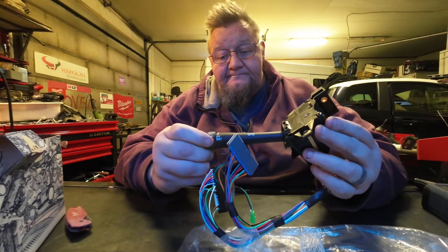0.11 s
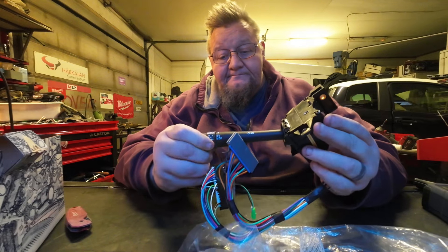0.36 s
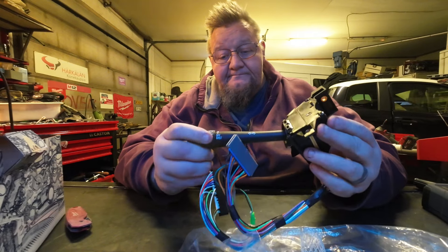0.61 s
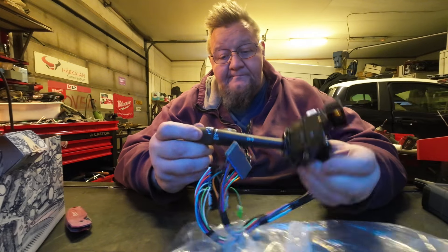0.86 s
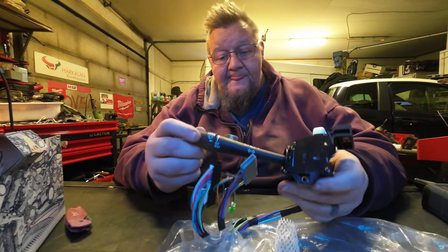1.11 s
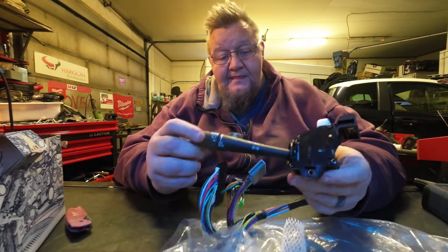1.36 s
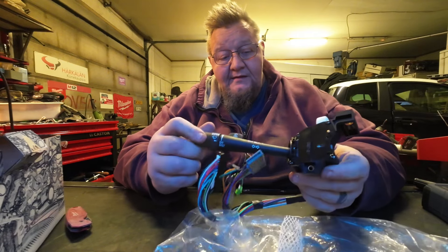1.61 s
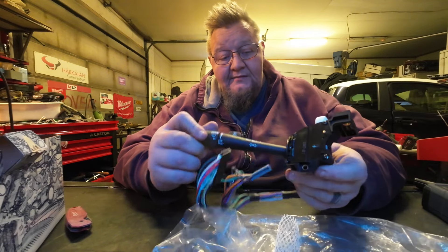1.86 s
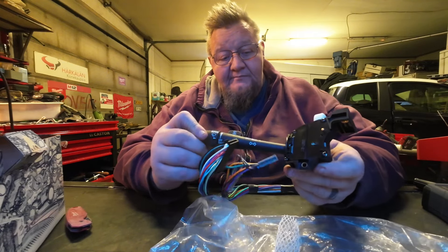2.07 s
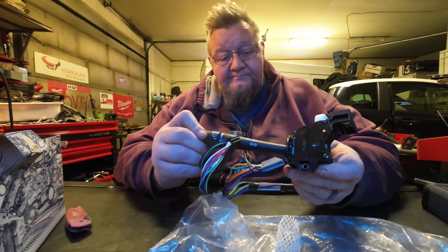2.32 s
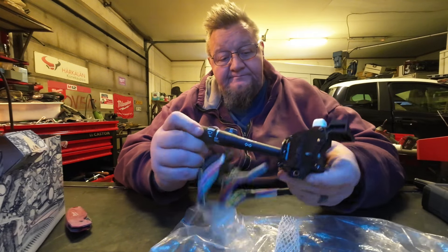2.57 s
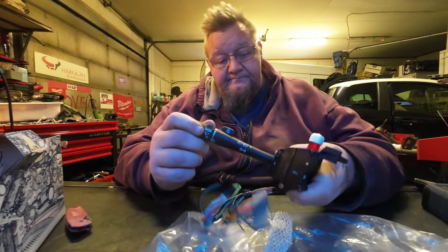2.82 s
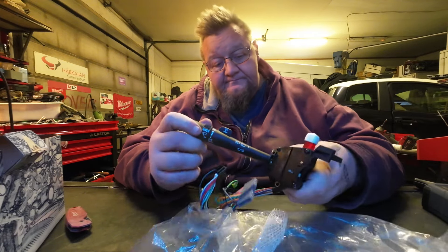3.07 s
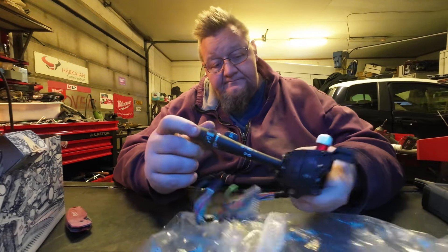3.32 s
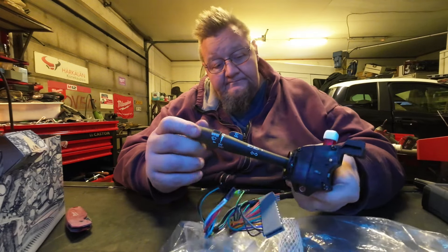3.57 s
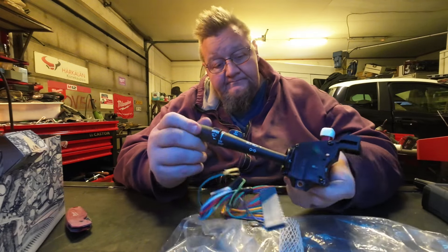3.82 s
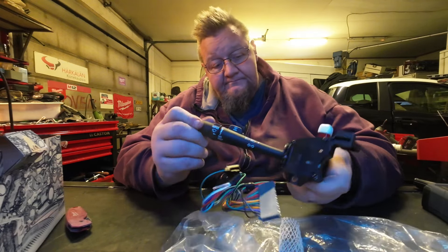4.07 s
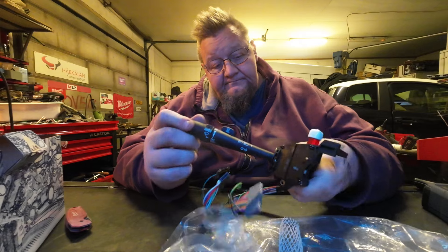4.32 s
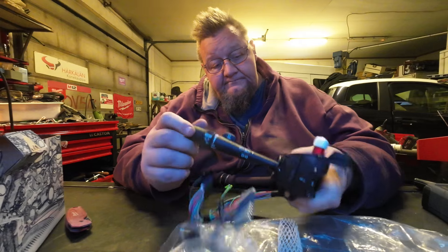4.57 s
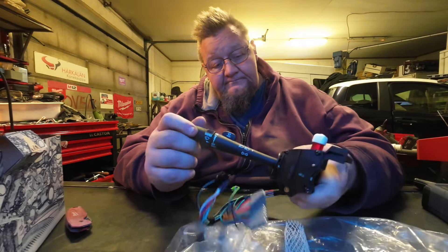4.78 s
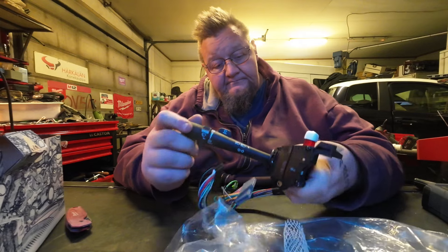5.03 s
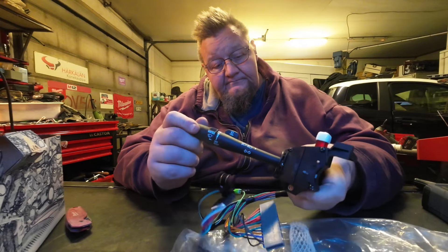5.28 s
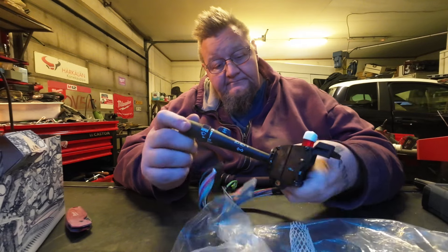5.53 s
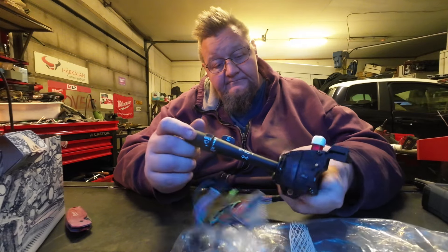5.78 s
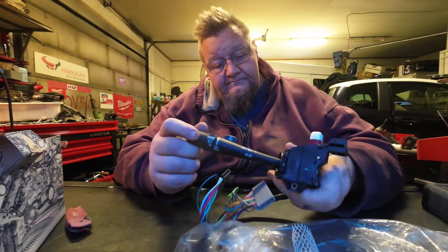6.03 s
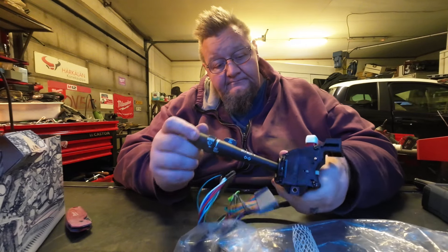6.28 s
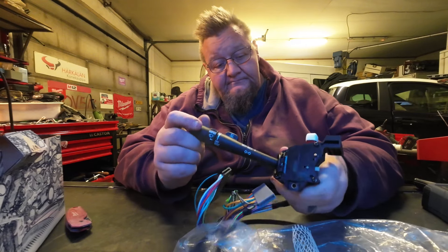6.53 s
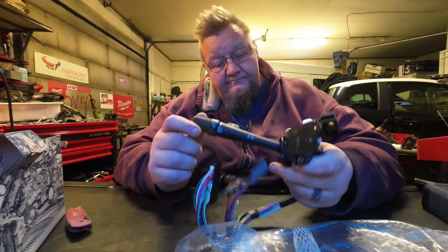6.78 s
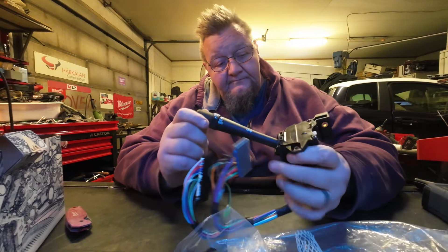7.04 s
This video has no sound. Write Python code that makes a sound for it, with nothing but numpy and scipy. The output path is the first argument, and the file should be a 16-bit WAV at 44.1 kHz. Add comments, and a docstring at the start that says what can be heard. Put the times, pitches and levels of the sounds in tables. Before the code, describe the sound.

In a quiet garage with a faint low fan hum, a wire harness drags across a thin plastic bag, crinkling and popping in uneven bursts. From about three seconds, a plastic stalk switch is worked by hand, giving short sharp clicks at spaced intervals, some with soft low knocks through the bench. The bag keeps rustling between them. Close stereo microphone, slight room echo.

```python
"""A distant fan and other hums, sine waves of wavering phase, lie over the hiss of a garage's air throughout.
Soon a switch's wire harness drags over a plastic bag: shaped noise rustles, short ticks and puffs crackle.
Fingers and wires rub as bands of hiss; the workbench adds low noise swells and, later, fading knocks.
From about three seconds on, the detent of the plastic stalk switch snaps: short rattles make it ring.
Two close microphone ports agree best in the middle range and differ more in the treble."""
import sys
import numpy as np
from scipy import signal
from scipy.fft import rfft, irfft, next_fast_len
from scipy.io import wavfile
from scipy.ndimage import uniform_filter1d

SR = 44100
rng = np.random.default_rng(int(sys.argv[2]) if len(sys.argv) > 2 else 0)


def wav_record(signal):
    """Record a signal, one row per channel, as 16-bit PCM in the file named by sys.argv[1]."""
    frames = np.transpose(np.atleast_2d(signal))
    bounded = np.clip(frames, -1, 1)
    # unit amplitude maps onto the largest positive 16-bit level
    quanta = np.round(bounded * 32767).astype(np.int16)
    wavfile.write(sys.argv[1], SR, quanta)


def field_ratio(decibels):
    """Amplitude ratio for a level in dB (20 dB per decade); scalars and array-likes work."""
    return 10 ** (np.asarray(decibels, dtype=float) / 20)


N = 314874  # length in samples

# How far the two ports differ for sound from all around the room.
# Each row: frequency in Hz, port difference against port sum in dB.
ROOM_SIDE = [(60, 1.5), (110, -14), (200, -30), (380, -21.5), (700, -10), (1290, -100.5), (2380, -16.5),
             (4400, -3.5), (8120, 3.5), (15000, 3.5)]


def evened(x):
    """Gives a sound an rms of 1."""
    return x / np.sqrt(np.mean(x ** 2) + 1e-20)


def levelled(x):
    """Gives each short sound an rms of 1 over its first 3 ms."""
    return x / np.sqrt(np.mean(x[..., :132] ** 2, -1, keepdims=True) + 1e-20)


def read(points, hz):
    """Reads a table between its points, along a logarithmic frequency axis."""
    f, value = np.transpose(points)
    return np.interp(np.log(hz + 1), np.log(f + 1), value)


def coloured(x, points):
    """Filters x by a spectrum in dB."""
    size = next_fast_len(N)
    gain = field_ratio(read(points, np.fft.rfftfreq(size, 1 / SR)))
    return irfft(rfft(x, size) * gain, size)[..., :N]


def band(x, lo_hz, hi_hz):
    """Keeps the frequencies from lo_hz to hi_hz."""
    return signal.sosfilt(signal.butter(2, [lo_hz, hi_hz], "band", fs=SR, output="sos"), x)


def add(mix, s, sound):
    """Adds a sound to the mix at s seconds, cut off where the mix ends."""
    part = mix[..., round(s * SR):][..., :sound.shape[-1]]
    part += sound[..., :part.shape[-1]]


def ports(total, other, side):
    """Left and right from the port sum and an unlike signal that makes their difference."""
    difference = coloured(other, side)
    return np.array([total + difference, total - difference])


def swells(rows, rest_db, roundness):
    """Level in dB of overlapping swells above a resting level."""
    t = np.arange(0, N + 32, 32) / SR
    s, db, rise, fall = np.transpose(rows)[:, :, None]
    before = (s - t) / np.maximum(rise, .01)
    after = (t - s) / np.maximum(fall, .01)
    away = np.where(t < s, before, after)
    power = field_ratio(2 * rest_db) + field_ratio(2 * (db - 20 * away ** roundness)).sum(0)
    return np.interp(np.arange(N) / SR, t, 10 * np.log10(power))


def air():
    """Room air with slight drifting patches, and the wavering lines of the fan and other hums."""
    # Colour of the room air. Each row: frequency in Hz, relative level in dB per Hz.
    air_colour = [(25, -1), (65, -26.5), (108, -2.5), (163, -13.5), (200, -7.5), (255, -14.5), (340, -6),
                  (540, -10.5), (650, -18), (770, -10), (900, -16), (1200, -12), (1600, -19), (2500, -23),
                  (4000, -35.5), (5500, -37), (7500, -48), (10000, -47.5), (11200, -46.5), (12000, -72),
                  (13500, -64), (15300, -59), (16500, -59)]
    # Blade-pass hum of the fan. Each row: multiple of fan_hz, rms level in dB, width in Hz.
    fan_lines = [(1, -65, 2.2), (2, -77, 6.8), (3, -69.5, 4.53), (4, -68, 4.5), (5, -71.5, 2.8),
                 (7, -72.5, 10)]
    # Other steady hums. Each row: frequency in Hz, rms level in dB, width in Hz.
    other_hums = [(100, -64, 1.5), (121, -65, 2.5), (365, -72, 10), (400, -71, 5)]
    fan_hz, air_db = 108.4, -57.5
    z = signal.stft(rng.standard_normal((2, N + 2048)), nperseg=1024)[2]
    patches = uniform_filter1d(rng.standard_normal(z.shape[1:]), 10, 0)
    patches = evened(uniform_filter1d(patches, 8, 1))
    noise = signal.istft(z * field_ratio(1.7 * patches), nperseg=1024)[1][:, :N]
    noise = coloured(noise, air_colour)
    noise *= field_ratio(air_db) / np.std(noise[0])
    fan = [(round(k) * fan_hz, db, width_hz) for k, db, width_hz in fan_lines]
    for hz, db, width_hz in [*fan, *other_hums]:
        # the phase drifts, the level holds
        wander = np.cumsum(rng.standard_normal(N)) * np.sqrt(2 * np.pi * width_hz / SR)
        noise[0] += field_ratio(db) * evened(np.sin(2 * np.pi * hz * np.arange(N) / SR + wander))
    return ports(*noise, ROOM_SIDE)


def drag_db():
    """How strongly the harness drags over the bag, in dB: strokes above a resting level."""
    # Strokes of the harness. Each row: loudest moment in seconds, drag level in dB,
    # rise in seconds over 20 dB, fall in seconds over 20 dB.
    strokes = [(.25, -75.5, .3, 0.13), (.45, -63, 0.14, 0.057), (.535, -59, 0.022, 0.098),
               (.62, -61, 0.13, 0.026), (.896, -46, 0.15, 0.15), (1.1, -53.5, 0.35, 0.17),
               (1.4, -53, 0.34, 0.36), (1.61, -58.5, 0.089, 0.033), (1.74, -59.5, 0.046, 0.16),
               (1.86, -55, 0.083, 0.11), (1.932, -47.5, 0.026, 0.021), (1.99, -58, 0.011, 0.013),
               (2.62, -58, 0.09, .05), (2.68, -42, 0.06, 0.084), (2.79, -47, 0.17, 0.18),
               (3.07, -52.5, 0.28, 0.082), (3.3, -48.5, 0.11, 0.048), (3.44, -46, 0.18, .13),
               (3.66, -70, 0.1, .1), (3.74, -61, 0.058, 0.081), (3.91, -70.5, 0.1, 0.061),
               (4.17, -58, 0.051, 0.085), (4.238, -44, 0.034, 0.044), (4.345, -58, 0.032, 0.18),
               (4.58, -51, 0.037, 0.17), (4.7, -47.5, 0.074, 0.085), (4.9, -61.5, 0.26, 0.45),
               (5.19, -53, 0.051, 0.11), (5.3, -51, .15, 0.067), (5.476, -58, 0.094, 0.095),
               (5.58, -62, 0.14, 0.18), (5.745, -57, 0.049, 0.16), (5.86, -52.5, 0.12, 0.16),
               (6.26, -62.5, 0.097, 0.48), (6.5, -68, 0.33, 0.47), (6.84, -47, 0.1, 0.14)]
    rest_db, roundness = -79, 1.43  # roundness of a stroke's top: 1 pointed, 2 round
    return swells(strokes, rest_db, roundness)


def rustle():
    """Dense small slips of the film: hiss plus uneven grains, in clumps. Rows: a sound and an unlike twin."""
    # Colour of the plastic film. Each row: frequency in Hz, relative level in dB per Hz.
    film_colour = [(180, -27.5), (300, 1), (434, 5), (617, 1), (780, 1), (1450, 2), (1600, -1), (2520, 4.5),
                   (4390, 0), (5930, 4), (6780, -2.5), (9980, -4), (12600, -26.5), (15400, -16.5),
                   (16500, -49.5)]
    level_db = drag_db()
    clumps = field_ratio(2. * evened(uniform_filter1d(rng.standard_normal(N), 300)))
    grain_size = field_ratio(2.58 * np.minimum(rng.exponential(1, N), 4))
    grain_size *= rng.random(N) < 500. / SR  # some 500 grains a second
    grains = evened(signal.oaconvolve(grain_size, np.exp(-np.arange(200) / 53.0))[:N])
    hiss = clumps * (0.94 + 0.39 * grains) * rng.standard_normal((2, N))
    z = signal.stft(hiss, nperseg=256)[2]
    # different folds sound at different pitches: uneven patches some 800 Hz wide and 30 ms long
    folds = uniform_filter1d(rng.standard_normal(z.shape[1:]), 5, 0)
    folds = evened(uniform_filter1d(folds, 10, 1))
    slips = signal.istft(z * field_ratio(1.6 * folds), nperseg=256)[1][:, :N]
    slips = evened(coloured(slips, film_colour))
    dull = signal.lfilter(*signal.butter(1, 3500, fs=SR), slips)
    tilt_db = 1. + .02 * (level_db + 55)  # harder drags sound brighter
    return (dull * field_ratio(-tilt_db) + (slips - dull) * field_ratio(tilt_db)) * field_ratio(level_db)


def ticks():
    """Lesser folds pop at random, louder as the bag moves, each at one of ten pitches."""
    out, t = np.zeros((2, N)), np.arange(200) / SR
    for hz in np.geomspace(1800, 9500, num=10):
        pops = field_ratio(3.9 * np.minimum(rng.exponential(1, N), 3))
        pops = pops * (rng.random(N) < 9. / SR)  # some 9 a second at each pitch
        pops = pops * rng.choice([-1, 1], (2, N))
        ping = np.sin(2 * np.pi * hz * t) * np.exp(-t * hz / 2.3)
        out += signal.oaconvolve(pops, ping[None], axes=1)[:, :N]
    return out * field_ratio(drag_db() + 7.0)


def crackles():
    """Each fold that pops is a sharp tick with a short puff; the dull part lasts longest."""
    # Loudest crackles of the bag, before they travel to the microphone.
    # Each row: start in seconds, peak in dB, pitch of the fold in Hz,
    # loss in dB per squared octave away from that pitch (below 0 counts as 0).
    loud_folds = [(0.5252, -38, 2400, 5.0), (0.7921, -39, 2500, 4), (0.8744, -39, 5780, 5.0),
                  (0.887, -35, 6010, 5.0), (1.0856, -25.5, 8220, 12), (1.1597, -37.5, 2220, 9),
                  (1.205, -34.5, 2660, 3), (1.229, -31.5, 2600, 4), (1.2496, -33, 2270, 1),
                  (1.4271, -22.5, 4870, 17), (1.475, -33, 5100, 18), (1.546, -52, 5070, 14),
                  (1.5884, -27.5, 1250, 2.5), (1.6181, -28.5, 4850, 0.5), (1.714, -32, 5070, 14),
                  (1.773, -29, 2120, 1.5), (1.8107, -35.5, 4830, 26), (1.8881, -37, 2080, 8),
                  (1.9177, -27.5, 2990, 11), (1.9767, -33, 2360, 16), (1.9885, -31, 2990, 6),
                  (2.141, -33, 1600, 3), (2.2757, -49, 1220, 10), (2.5531, -34.5, 2100, 11),
                  (2.647, -31, 9930, 5.0), (2.662, -27, 5950, 9), (2.6655, -23, 5180, 14),
                  (2.6732, -21, 2750, 5.0), (2.6974, -23, 3210, 13), (2.7047, -22, 5710, 11),
                  (2.7089, -17.5, 5600, 24), (2.7492, -38, 5970, 5.0), (2.7726, -24, 4050, 10),
                  (2.8036, -34, 5020, 3), (2.8886, -31, 6030, -1), (2.8962, -29, 5160, 0),
                  (2.9917, -46, 1300, 5.0), (3.2448, -33, 4960, 5.0), (3.3014, -34, 2790, 5.0),
                  (3.377, -34, 3290, 1), (3.7264, -37, 1510, 1), (3.7437, -37.5, 2290, 8),
                  (3.8726, -45, 1220, 5.0), (4.181, -36, 2170, 3), (4.2263, -28.5, 6860, 3),
                  (4.4234, -39, 1370, 2), (4.5575, -32.5, 1330, 8), (4.589, -40, 3160, 2),
                  (4.666, -43, 5550, 5.0), (4.718, -35, 4880, 5.0), (4.8577, -36, 3120, 3),
                  (4.8926, -33.5, 3030, 5.0), (4.9716, -35.5, 6270, 1), (5.013, -37.5, 3740, 10),
                  (5.1527, -46, 2860, 5.0), (5.1857, -34, 5200, 5.0), (5.2046, -35.5, 1440, 8),
                  (5.2777, -22, 3700, 5.0), (5.3998, -35, 2280, 9), (5.4575, -44, 2470, 5.0),
                  (5.4774, -41, 4690, 13), (5.4874, -45, 1970, 5.0), (5.634, -43, 3540, 10),
                  (5.737, -29.5, 2820, 8), (5.7748, -49, 5140, 5.0), (5.7967, -37, 5100, 21),
                  (5.996, -55, 1200, 5.0), (6.0336, -45, 1310, 10), (6.064, -41.5, 1200, 7),
                  (6.1614, -37, 3150, 6.5), (6.243, -34, 2520, 4.5), (6.602, -39, 2050, 12),
                  (6.6862, -36, 1500, 8), (6.791, -25, 3420, 9), (6.8004, -30, 5000, 14),
                  (6.8224, -41, 3010, 5.0), (6.8324, -23.5, 4800, 11), (6.924, -24.5, 4940, 7.5)]
    # Pitches in Hz of the dull, middle and bright part of a pop.
    parts_hz = np.array([1730, 4400, 8450])
    out, t = np.zeros((2, N)), np.arange(1200) / SR
    # for the dull, middle and bright part: strength of the puff, its decay in seconds
    puff, lasting = np.array([[0.32, 0.3, 0.1], [0.0057, 0.0029, 0.0028]])[:, :, None, None]
    noise = rng.standard_normal((len(loud_folds), 1, 2, len(t)))
    noise = noise + 1.95 * (t == 0) * [[1], [0]]  # a clean tick, in the first row only
    noise = noise * (np.exp(-t / 0.0001) + puff * np.exp(-t / lasting))
    dull = band(noise[:, 0], 1000, 3000)
    middle = band(noise[:, 1], 3000, 6500)
    bright = band(noise[:, 2], 6500, 11000)
    parts = levelled(np.stack([dull, middle, bright], 1))
    for (s, db, hz, narrow_db), part in zip(loud_folds, parts):
        loss_db = max(narrow_db, 0) * np.log2(parts_hz / hz) ** 2
        pop = np.tensordot(field_ratio(-loss_db), part, 1)
        add(out, s, field_ratio(db) * pop / abs(pop[0]).max())
    return out


def slides():
    """Skin or wire rubbing on the switch: hiss in one band."""
    # Each row: start in seconds, end in seconds, middle of the band in Hz, width in Hz,
    # rms level in dB before the hiss is faded.
    rubs = [(6.07, 6.15, 7400, 1100, -64), (6.37, 6.6, 5640, 1100, -60), (1.478, 1.52, 5000, 500, -60),
            (5.113, 5.13, 1900, 1600, -55), (5.148, 5.172, 2200, 2600, -50),
            (5.203, 5.222, 2200, 2800, -49), (5.742, 5.758, 1500, 1600, -54), (.872, .895, 3200, 2400, -47)]
    out = np.zeros((2, N))
    for start, end, hz, width_hz, db in rubs:
        hiss = band(rng.standard_normal((2, SR // 4)), hz - width_hz / 2, hz + width_hz / 2)
        hiss = hiss[:, :round((end - start) * SR)]
        length = hiss.shape[1]
        fade = signal.windows.tukey(length, .4) * field_ratio(np.linspace(2, -3.5, length))
        add(out, start, field_ratio(db) * evened(hiss) * fade)
    return out


def bench():
    """Lumpy low rumble that also rocks the mount, and separate knocks."""
    # Bumps through the bench. Each row: loudest moment in seconds, level in dB,
    # rise in seconds over 20 dB, fall in seconds over 20 dB.
    bumps = [(.99, -65, 0.23, 0.24), (1.21, -65, 0.09, 0.11), (2.03, -67, .1, 0.25), (2.76, -52.5, 0.2, .3),
             (2.98, -54, 0.21, 0.23), (3.25, -64.5, .2, 0.57), (4.24, -44.5, 0.029, 0.18),
             (4.34, -46, 0.12, 0.18), (4.59, -56, 0.076, 0.042), (4.69, -57, 0.057, .2),
             (4.93, -48, 0.061, 0.12), (5.31, -55, .2, 0.061), (5.55, -44.5, 0.076, 0.06),
             (5.83, -55.5, .18, 0.12), (6.375, -39.5, 0.031, 0.027), (6.48, -65, .3, .12),
             (6.8, -57, 0.051, .025)]
    # Modes in which the microphone mount rocks sideways, heard in opposite sense at the two ports.
    # Each row: frequency in Hz, width in Hz, rms level in dB against the push.
    mount_modes = [(24, 3, 0), (148, 22, -10), (255, 30, -22)]
    # Knocks that shake the mount. Each row: start in seconds, level in dB before the soft onset,
    # frequency in Hz, time to fall by 60 dB in seconds, turns by which the right port leads.
    knocks = [(2.699, -39, 133, 0.22, 0.27), (2.95, -45, 95, 0.08, 0.18), (4.226, -22, 156, .13, 0.39),
              (4.335, -38, 121, 0.2, .4), (4.565, -46, 152, .2, 0.62), (4.698, -36.5, 89, 0.066, 0.096),
              (4.886, -46, 146, .15, 0.41), (4.93, -33.5, 157.5, 0.14, 0.32), (5.25, -41, 75, 0.099, .05),
              (5.501, -47, 150, .12, .5), (5.541, -34.5, 150, 0.11, 0.37), (5.532, -34, 74.6, 0.13, 0.045),
              (6.367, -30, 118, 0.07, 0.29)]
    rest_db, roundness = -70.5, 0.86  # the bench at rest; roundness of a bump's top
    noise, push = rng.standard_normal((4, N)), field_ratio(swells(bumps, rest_db, roundness))
    rumble = evened(band(noise[0], 30, 85)) + .6 * evened(band(noise[1], 22, 27))
    rumble = evened(rumble) * push
    rocking = 0.3 * evened(band(noise[2], 30, 100)) * push
    for hz, width_hz, db in mount_modes:
        mode = signal.iirpeak(hz, hz / width_hz, SR)
        steady = np.std(signal.lfilter(*mode, noise[3]))
        rocking += field_ratio(db) * signal.lfilter(*mode, noise[3] * push) / steady
    out, t = np.array([rumble + rocking, rumble - rocking]), np.arange(SR // 3) / SR
    for s, db, hz, t60, lead in knocks:
        swing = np.sin(2 * np.pi * (hz * t + np.array([[0], [lead]])))
        # the bench top shudders
        swing += 0.27 * evened(band(rng.standard_normal((2, len(t))), 63.2, 240))
        onset = 1 - np.exp(-t / 0.0027)
        add(out, s, swing * field_ratio(db - 60 * t / max(t60, .01)) * onset)
    return out


def snaps():
    """Each blow is a short rattle of loose parts through the heavily damped modes of the switch."""
    # Detent snaps and their bounces, before they travel to the microphone; levels are rms over 3 ms.
    # Each row: start in seconds, lever level in dB, housing against lever in dB,
    # tick against lever in dB, decay of the rattle in seconds.
    blows = [(2.9275, -42, -10, 5, 0.00027), (2.9285, -29, -9, -0.5, 0.0023),
             (4.327, -26.5, -1.5, -3, 0.0045), (4.3304, -33, 5.5, -7, 0.0053),
             (4.9142, -28.5, -9, -1, 0.0024), (4.917, -31.5, 1.5, -4, 0.0019),
             (5.521, -31.5, -5, 4.5, 0.0034), (5.525, -23, 0.5, -23, 0.0014),
             (6.301, -42, -8.5, -5.5, 0.0018), (6.3164, -39, -13, -5, 0.005),
             (6.3681, -23.5, -24, 7, 0.00046), (6.3693, -35, -22, 1, 0.0025)]
    # What the switch rings with. Each row: frequency in Hz, width in Hz (damping uses at least 150),
    # relative level in dB within its part of the switch.
    switch_modes = [(415, 120, -9.5), (734, 74, -28), (950, 210, -11), (1300, 92, 5.5), (1590, 380, -4),
                    (2260, 120, -15), (2780, 300, 17.5), (3220, 250, 10.5), (3660, 480, -25),
                    (5300, 170, 2), (5970, 780, 14), (6260, 1500, -3), (7380, 1000, -10.5),
                    (9640, 760, -15.5)]
    shell_db = -1.14  # the shell against the lever
    strike, crisp_s = 4.5, 0.00072  # clean first blow; it weakens for rattles longer than crisp_s
    out, t = np.zeros((2, N)), np.arange(2500) / SR
    hz, width_hz, mode_db = np.transpose(switch_modes)[:, :, None, None]
    damping = np.exp(-np.pi * np.maximum(width_hz, 150) * t)
    modes = field_ratio(mode_db) * damping * np.sin(2 * np.pi * hz * t) * np.sqrt(width_hz)
    part = np.digitize(hz.ravel(), [1900, 4500, 6900])  # housing, shell, lever, tick
    bodies = np.array([modes[part == k].sum(0) for k in range(4)])
    # longer chatter of each part: its strength, its decay in seconds
    chatter = np.array([[0.12, 0.57, 0.44, 0.024], [0.012, 0.0042, 0.0055, 0.005]])
    loose, lasting = chatter[:, :, None, None]
    for s, db, housing_db, tick_db, length in blows:
        fading = np.exp(-t / max(length, 1e-4)) + loose * np.exp(-t / lasting)
        rattle = rng.standard_normal((4, 2, len(t))) * (1 - np.exp(-t * 3000)) * fading
        first_blow = strike * np.exp(-length / crisp_s) * (t == 0) * [[1], [.4]]
        rung = signal.fftconvolve(bodies, rattle + first_blow, axes=2)[..., :len(t)]
        part_db = db + np.array([housing_db, shell_db, 0, tick_db])
        add(out, s, np.tensordot(field_ratio(part_db), levelled(rung), 1))
    return out


def garage(x):
    """Echoes of the room: sparse taps of random sign, each band dying at its own speed."""
    # Each row: frequency in Hz, time to fall by 60 dB in seconds.
    dying = [(200, 0.58), (1500, 0.36), (5000, 0.32), (12000, 0.42)]
    taps = np.zeros((2, SR // 2))
    at = np.arange(300, SR // 2 - 20, 20) + rng.integers(0, 20, (2, (SR // 2 - 301) // 20))
    np.put_along_axis(taps, at, rng.choice([-1., 1.], at.shape), 1)
    hz, t, z = signal.stft(taps, SR, nperseg=256)
    decay = field_ratio(-60 * t / read(dying, hz)[:, None])
    tail = signal.istft(z * decay, SR, nperseg=256)[1]
    wet = signal.fftconvolve(x[None], tail / np.linalg.norm(tail[0]), axes=1)[:, :N]
    return ports(*wet, ROOM_SIDE)


def scene():
    """Sums the sounds of bag and switch, their echoes in the garage, the bench and the air."""
    # How hits reach the microphone, losing the top and the bass. Each row: frequency in Hz, gain in dB.
    reach = [(150, -20.5), (400, -8), (10500, -0.5), (12000, -17), (13500, -20), (15300, -3), (16500, -27)]
    # How far the ports differ for rustle and rubbing on the switch, then for snaps and crackles. # Each row:
    # frequency in Hz, port difference against port sum in dB.
    near_side = [(60, -4), (110, -18), (200, -7), (380, -38), (700, -29.5), (1290, -33.5), (2380, -67.5),
                 (4400, -16), (8120, -3), (15000, 0)]
    hit_side = [(200, -21), (700, -28), (1290, -29.5), (2380, -24), (4400, -10.5), (8120, -6), (15000, 2)]
    near = rustle() + slides()
    hits = coloured(ticks() + crackles() + snaps(), reach)
    direct = ports(*near, near_side) + ports(*hits, hit_side)
    echoes = field_ratio(-28.5) * garage(near[0] + hits[0])
    return direct + echoes + bench() + air()


def low_pass(x):
    """Removes everything above the highest recorded frequency."""
    return signal.sosfilt(signal.butter(12, 17060, fs=SR, output="sos"), x)


def record(dry):
    """The two microphone ports: the left one hears more treble."""
    # Each row: frequency in Hz, gain of the left port in dB.
    left_lift = [(60, 3), (110, 0.0), (200, 2), (380, -0.5), (700, 0.0), (1290, -0.5), (2380, 1.5),
                 (4400, 2), (8120, 0.5), (15000, 2.5)]
    left = coloured(dry, left_lift)[0]
    return low_pass(np.array([left, dry[1]]))


dry = scene()
out = record(dry)
wav_record(out)
```